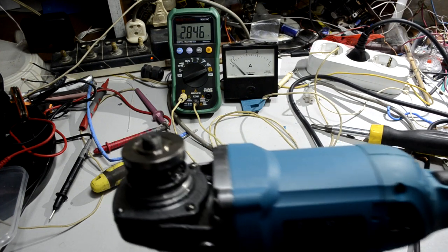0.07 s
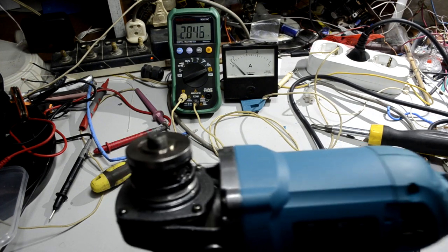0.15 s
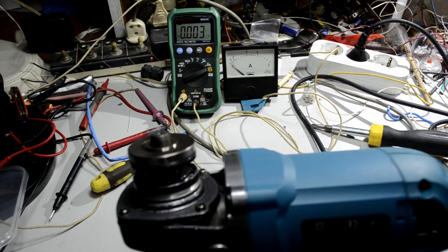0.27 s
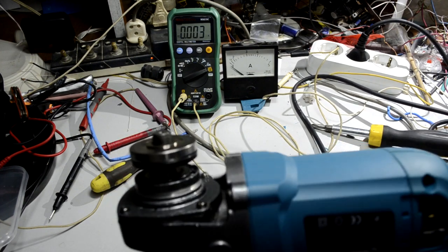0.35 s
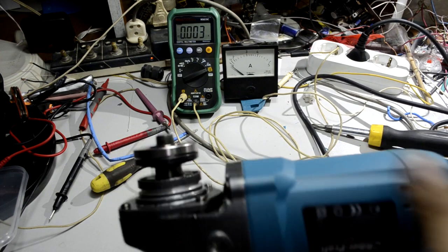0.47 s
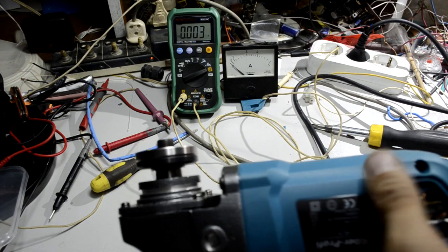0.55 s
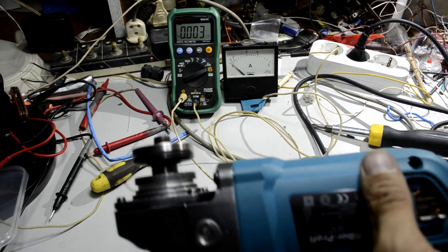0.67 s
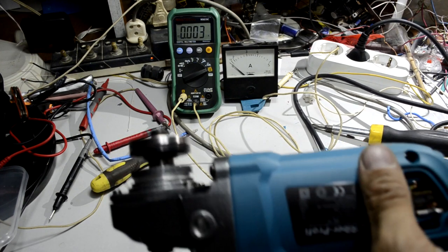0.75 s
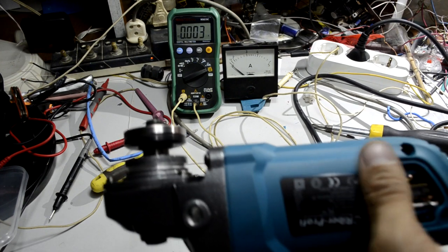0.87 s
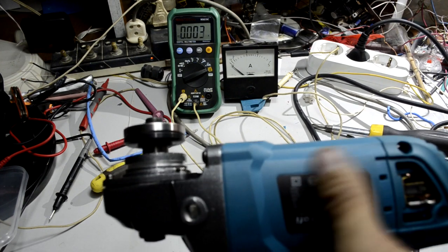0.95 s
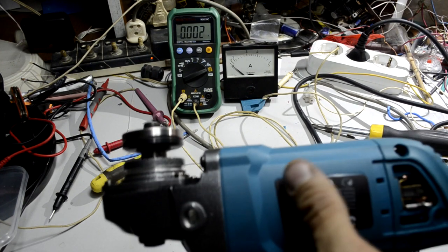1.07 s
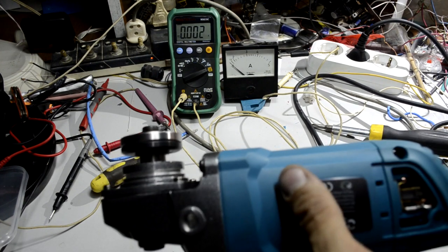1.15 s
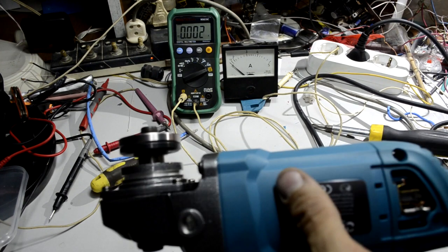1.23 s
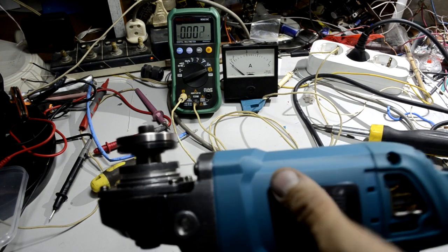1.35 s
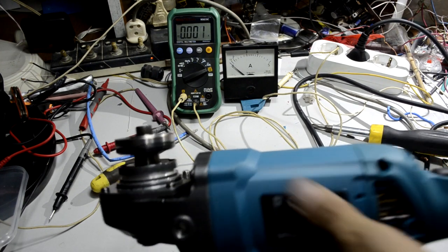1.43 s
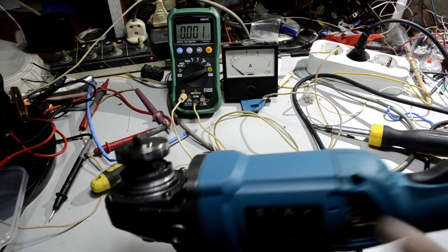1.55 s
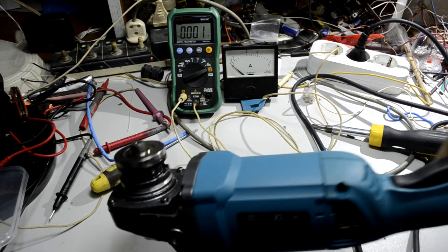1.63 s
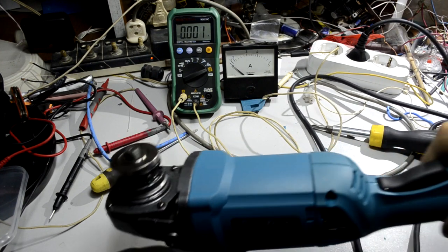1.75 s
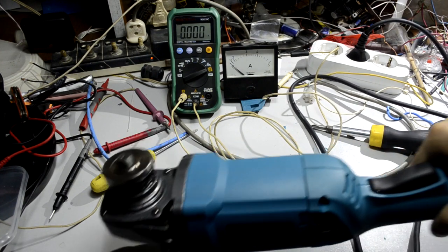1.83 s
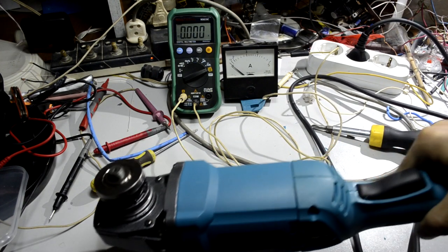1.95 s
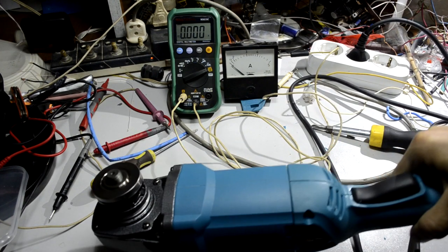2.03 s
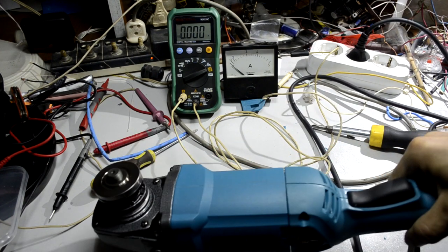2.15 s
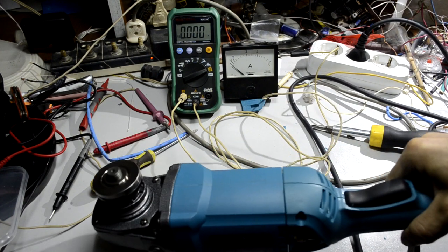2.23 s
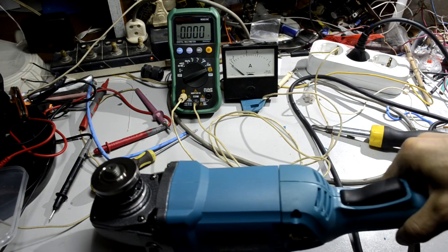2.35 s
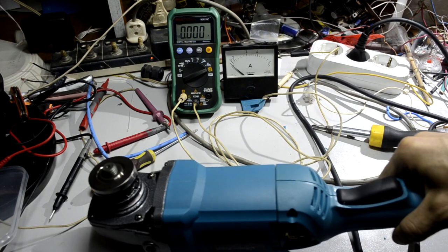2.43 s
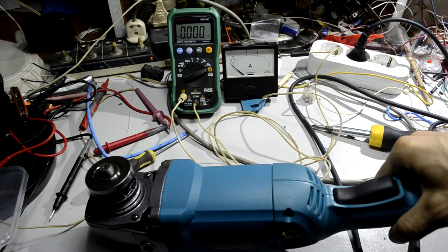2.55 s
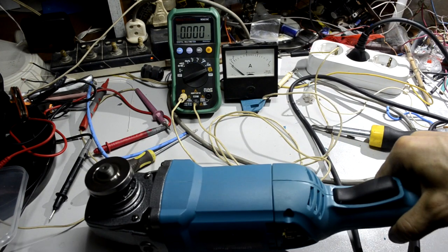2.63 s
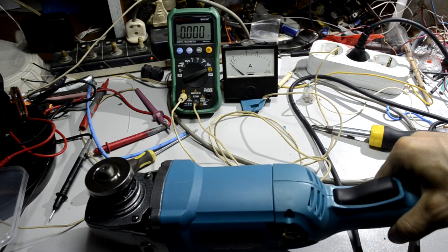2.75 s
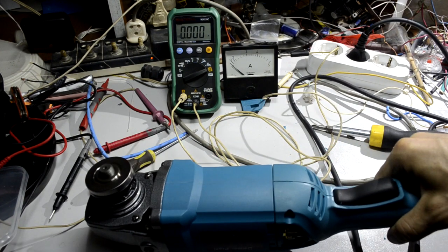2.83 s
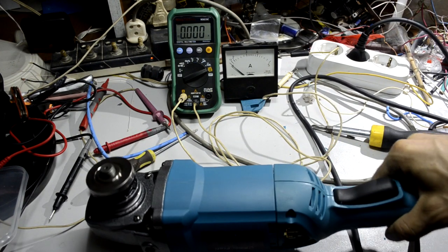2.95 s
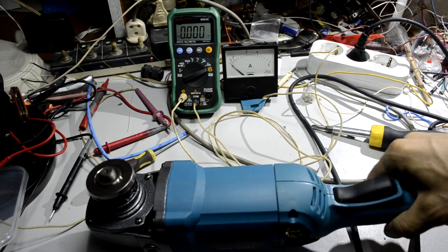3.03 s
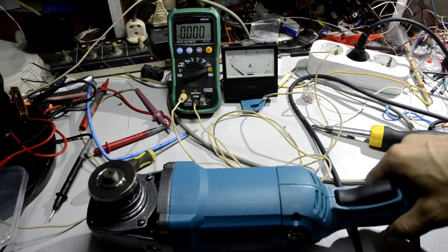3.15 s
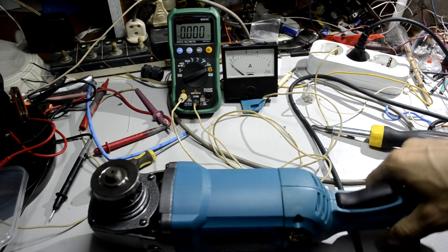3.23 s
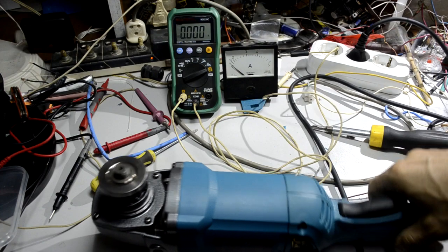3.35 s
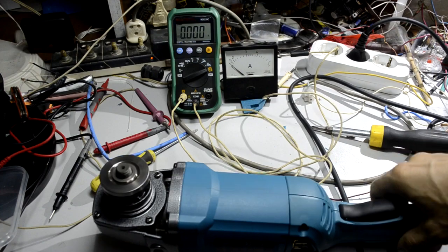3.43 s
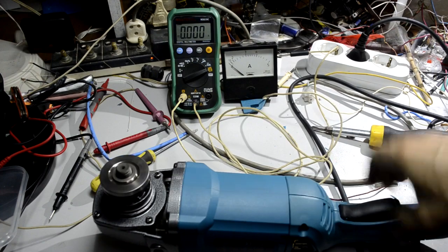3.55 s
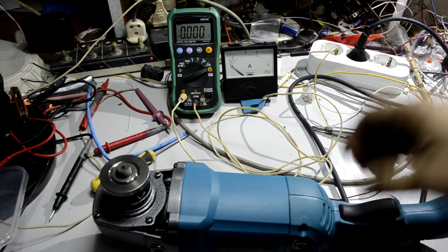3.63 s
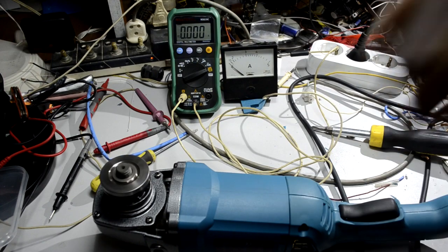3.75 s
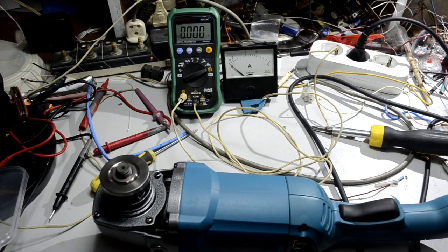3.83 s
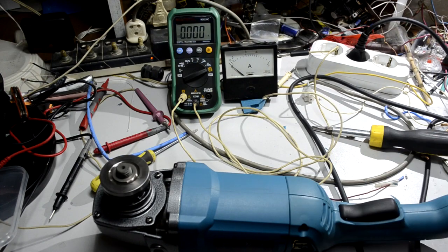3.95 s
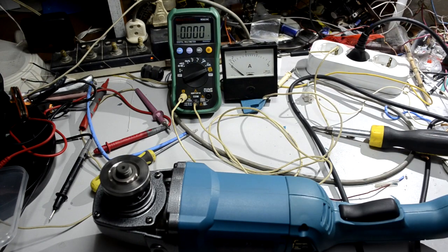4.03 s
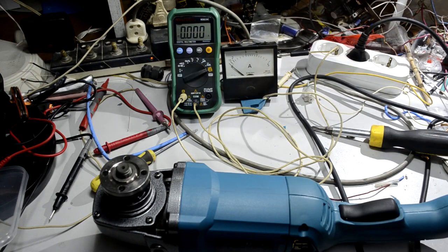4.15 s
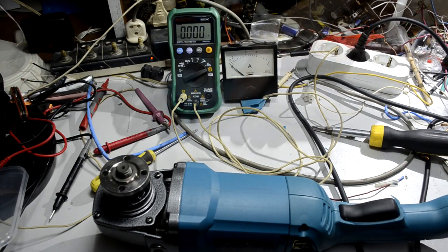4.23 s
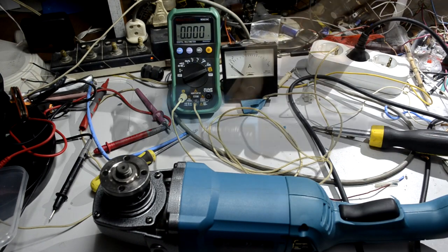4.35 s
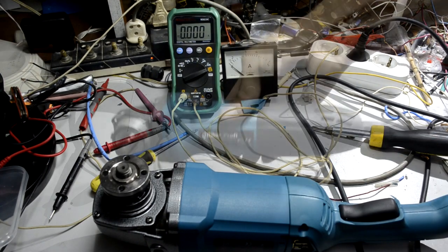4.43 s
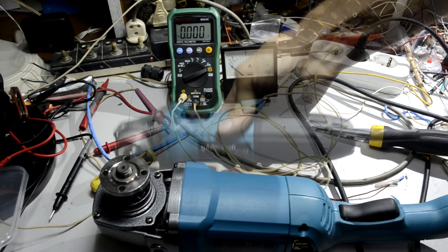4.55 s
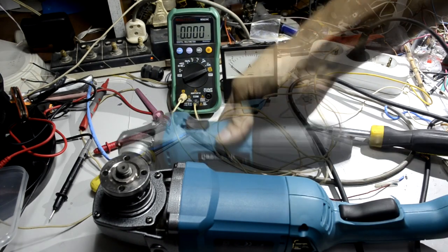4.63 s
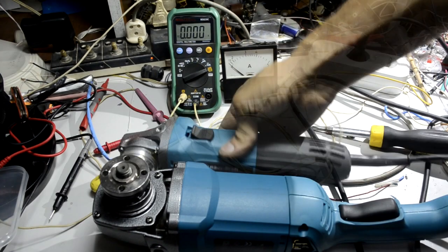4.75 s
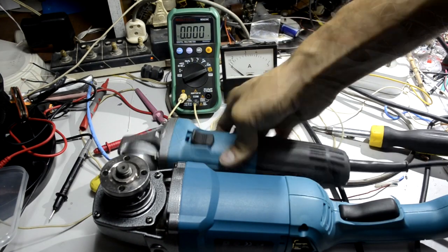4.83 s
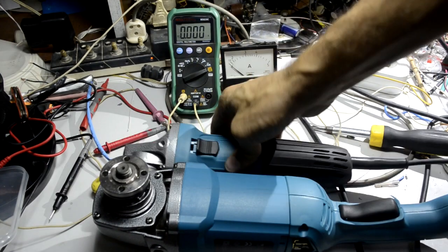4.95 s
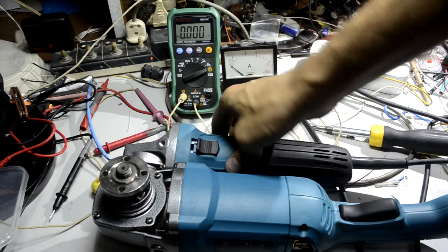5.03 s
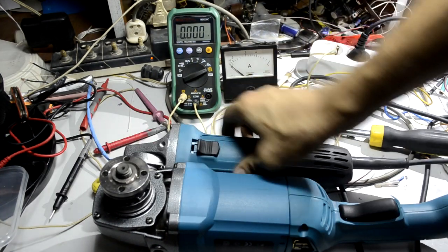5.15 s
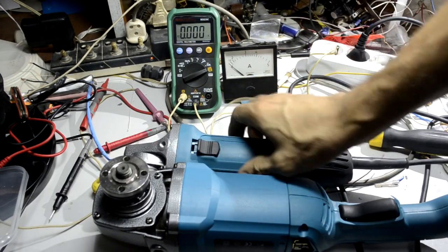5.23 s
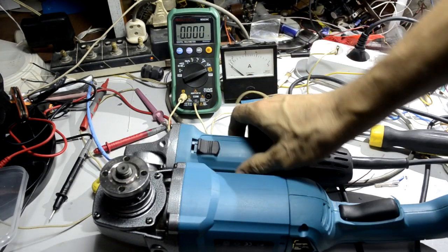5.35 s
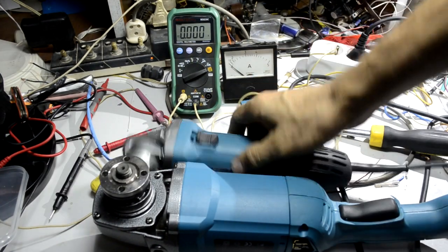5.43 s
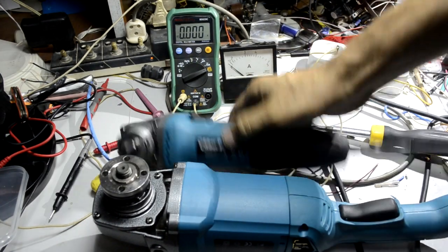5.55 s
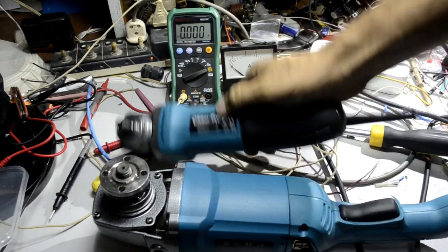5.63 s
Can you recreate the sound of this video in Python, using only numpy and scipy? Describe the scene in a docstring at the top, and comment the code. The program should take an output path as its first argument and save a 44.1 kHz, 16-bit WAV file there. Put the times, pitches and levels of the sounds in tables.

```python
"""First you hear the roar and gliding whine of an angle grinder without a disc, just switched off, close by.
Shaped noise makes the fan, bearings and brushes, which sink with the speed; sine waves make the whine. The
slack bevel gears rattle ever more slowly, until single clacks of noise stand out and the shaft stops. Fading
tones and noise bursts knock as the tool settles and is laid on the bench of a small workshop. Further knocks
follow as a second grinder is set down beside it and shifted, with a soft scrape of shaped noise."""
import sys
import numpy as np
from scipy import signal
from scipy.fft import rfft, irfft, next_fast_len
from scipy.io import wavfile
from scipy.ndimage import map_coordinates

SR = 44100
rng = np.random.default_rng(int(sys.argv[2]) if len(sys.argv) > 2 else 0)


def dump_mix(stems):
    """Bounce the given channels to the path in sys.argv[1] as a 16-bit WAV at rate SR."""
    frames = np.atleast_2d(stems).T  # one column per channel
    limited = np.clip(frames, -1, 1)  # hard clip at full scale
    pcm = np.round(limited * 32767).astype(np.int16)
    wavfile.write(sys.argv[1], SR, pcm)


N = 250913
T = np.arange(N) / SR  # time in seconds
RING_T = T[:SR // 3]  # the time given to one ringing knock
BARS = 24  # copper bars on the commutator
QUIET_DB = -57.5
TOP_HZ = 15950  # nothing is kept from here up

# Levels in the tables are relative: most get a fixed trim where they are used.
# How fast the motor shaft turns as it coasts: time_s, speed_turns_per_s
SHAFT_SPEED = [(0, 423), (.35, 361), (.6, 325.5), (.87, 290.5), (1.18, 253), (1.5, 217), (1.73, 193),
               (2.05, 162.5), (2.22, 145.5), (2.55, 116), (2.77, 97.3), (3.08, 73), (3.5, 44), (4.2, 0)]
# Loudness of the running parts: time_s, fan_db, bearings_db, brushes_db
RUNNING_LEVELS = [(0.0, -17, -16, -33.5), (1.08, -19, -16.5, -40.5), (1.19, -19.5, -17.5, -42),
                  (1.61, -24, -18, -45.5), (2.07, -27.5, -23, -49), (2.43, -30, -23.5, -51),
                  (2.72, -35.5, -25.5, -57), (2.96, -37, -28, -58), (3.21, -35.5, -31, -65),
                  (3.69, -38, -38, -74), (3.89, -41, -51, -76.5), (4.0, -50, -59.5, -85),
                  (4.13, -54, -57.5, -79), (4.25, -60, -62.5, -84)]
# Two housing tones excited by the rattle: time_s, low_tone_db, high_tone_db
SINGING_LEVELS = [(0.0, -22, -38), (1.0, -35, -17), (1.11, -27, -17), (1.19, -31, -22), (1.51, -42, -20),
                  (1.54, -23, -25), (1.9, -18.5, -34), (1.96, -14.5, -59), (2.14, -31, -44),
                  (2.17, -12, -31.5), (2.45, -29, -50)]
# Tone colour of the fan roar: pitch_hz, level_db
FAN_COLOUR = [(30, -49), (70, -38.5), (140, -15.5), (250, -9), (420, -4.5), (650, 0), (900, 6), (1300, 0.5),
              (2200, -10), (4000, -33.5), (8000, -49)]
# Tone colour of the rolling bearings: pitch_hz, level_db
BEARING_COLOUR = [(100, -46), (400, -30), (800, -3), (1500, -3), (2400, 0.5), (3300, -2), (4300, -6),
                  (5200, -17), (6400, -35), (9000, -62), (15000, -62)]
# Tone colour of the brush hiss: pitch_hz, level_db
BRUSH_COLOUR = [(1500, -19.5), (4000, 5.5), (5500, 3), (7200, 3), (9000, 0), (10200, -0.5), (11800, 0.5),
                (13500, -4), (15800, -18)]
# Tone colour of gear teeth hitting: pitch_hz, level_db
CLACK_COLOUR = [(60, -46), (250, -18), (500, -11), (900, -9.5), (1550, 2), (2100, -3.5), (2900, -2),
                (4200, -8), (5300, -30.5), (6900, -23), (7600, -12), (8050, -16.5), (8700, -38),
                (10800, -37), (11700, -28.5), (12800, -36.5), (15500, -54.5)]
# Resonances of the housing: pitch_hz, width_hz, level_db (against the broad colour)
HOUSING_MODES = [(396.7, 13, 1.5), (583.4, 21, -3), (749.5, 23, -3), (858.4, 18, 2), (1103, 26, 2.5),
                 (1430, 60, -3.5), (1587, 23, -4), (1843, 40, -1.5), (2015, 49, 6), (2270, 22, -13.5),
                 (2544, 81, -8.5), (3170, 120, -10.5), (3450, 75, -8.5), (4330, 90, -10)]
# Whine tones: order (cycles per shaft turn), level_db, band_centre_hz, band_width_octaves
WHINE_ORDERS = [(1, -22, 430, .11), (24, -28, 2950, .16), (24, -44, 5000, .2), (29, -40, 8750, .07),
                (29, -45, 10300, .22), (44, -53, 6200, .1), (48, -53, 6300, .13)]
# Share of fast rattle in the gearbox noise: speed_turns_per_s, power_share (0 to 1)
RATTLE_SHARE = [(95, .03), (140, .25), (165, .6), (220, .5), (300, .25), (420, .15)]
# Light, fast blows sound less of the gears' high ping: pitch_hz, level_db
LIGHT_BLOW_COLOUR = [(1500, -2), (2400, 2.5), (3300, 2), (4500, -2), (7000, -6.5), (9000, -4.5)]
# Gear teeth clacking across their slack: start_s, level_db, ping_db, bright_db, knock_db
GEAR_CLACKS = [(2.1052, -8, -30, -16, -32), (2.1456, -6, -35, -12, -29), (2.1606, -6, -29, -7, -26),
               (2.1736, -3.5, -23, -12, -25), (2.1884, -5.5, -27, -11, -31), (2.2349, 0.5, -39, -10, -36),
               (2.2504, -3, -37, -17, -31), (2.2664, -4, -31, -26.5, -26), (2.2903, -3, -24, -17, -27),
               (2.3277, -2.5, -28, -13, -36), (2.3534, -6, -25, -11, -22), (2.3654, -11, -24, -22, -30),
               (2.4005, -2.5, -30, -12, -35), (2.4144, -6.5, -26, -18, -39),
               (2.4463, -2.5, -32, -19, -21.5), (2.4689, -1.5, -23, -11, -25), (2.4953, -3, -37, -16, -23),
               (2.5104, -4.5, -22, -14, -36), (2.5263, -1.5, -35, -20, -28), (2.5442, -7.5, -18, -17, -45),
               (2.5632, -2.5, -35, -12, -39), (2.5754, -6, -30, -23, -26), (2.5904, -2, -29, -12, -38),
               (2.6054, -3, -26, -20, -43), (2.6204, -3.5, -22, -17, -31), (2.6638, -6, -21, -23, -35),
               (2.6873, -13, -17, -15, -26), (2.7003, -2.5, -27, -15.5, -36), (2.7413, -5.5, -23, -12, -40),
               (2.7647, -4.5, -24, -31, -30), (2.7762, -8, -30, -19, -27), (2.7924, -10, -28, -22, -25),
               (2.8064, -5.5, -28, -25, -39), (2.8204, -11, -28, -5, -26), (2.8405, -3.5, -29, -10, -35),
               (2.8674, -12, -18, -6, -24), (2.8834, -7, -25, -9, -44), (2.9189, -6, -28, -27, -34),
               (2.9388, -10, -22, -15, -27), (2.9583, -5, -32, -13, -35), (2.9787, -8, -21, -15, -31),
               (3.0062, -1, -36, -24, -30), (3.0381, -4, -32, -12, -34), (3.0756, -0.5, -41, -24, -28),
               (3.114, -5.5, -30, -15, -17), (3.1587, -2.5, -34, -27, -25), (3.2033, -7.5, -40, -22, -19),
               (3.2222, -7, -34, -11, -20), (3.2492, -7.5, -37, -3, -36), (3.2721, -8, -39, -9, -25),
               (3.2886, -6, -41, -8, -24), (3.3155, -6, -41, -12, -26), (3.3679, -5, -43, -13, -26),
               (3.3878, -5.5, -48, -31, -23), (3.4293, -7.5, -36, -11, -25), (3.4791, -11, -39, -9, -30),
               (3.5245, -11, -38, -2, -23), (3.5555, -6, -53, -27, -23), (3.6233, -12, -48, -10, -24),
               (3.6951, -16.5, -41, -33, -21), (3.7351, -10.5, -49, -16, -18),
               (3.7525, -10.5, -51, -31, -19), (3.7928, -10, -42, -24, -20), (3.8912, -10, -54, -27, -38),
               (3.9396, -13, -49, -18.5, -15), (3.9805, -19.5, -56, -33, -22),
               (4.0277, -11, -48, -30, -15.5), (4.0524, -19.5, -54, -27, -5), (4.0664, -24, -52, -26, -18),
               (4.0824, -29, -50, -25, -10), (4.1077, -36, -47, -20, -16), (4.1277, -22.5, -53, -36, -12),
               (4.1551, -25.5, -38, -33, -1)]
# Running tool settling on the bench: start_s, level_db, sway_db
SETTLING_THUDS = [(2.335, -18, -41), (2.459, -16, -47), (2.524, -29, -41), (2.936, -32.5, -53),
                  (3.018, -33, -57), (3.185, -35, -51), (3.42, -32, -39)]
# Contacts with the bench: start_s, peak_db (not used), thud_db, board_db, case_db, tick_db
BENCH_CONTACTS = [(4.574, -42, -64, -54, -52, -50), (4.608, -47.5, -61, -56, -54, -54.5),
                  (4.661, -33, -29, -25, -21.5, -45), (4.682, -18, -34, -36, -33, -44),
                  (4.733, -25, -38, -33, -37.5, -46.5), (4.777, -32, -43, -35, -39, -56),
                  (4.933, -23.5, -35, -23, -30, -39), (4.96, -31, -39, -44, -48, -49),
                  (4.983, -33, -48, -57, -64, -56.5), (5.028, -37, -54.5, -57.5, -55, -64),
                  (5.148, -35.5, -44, -42.5, -62, -73), (5.17, -34, -53, -48, -50, -49.5),
                  (5.239, -35, -57, -58, -46, -61.5), (5.3, -25, -53, -49.5, -43.5, -41.5),
                  (5.441, -24, -33.5, -30.5, -36.5, -54.5), (5.455, -26, -35, -44, -41, -56),
                  (5.588, -30, -44, -42.5, -40.5, -78)]
# Ringing of the heavy bench: pitch_hz, level_db, fade_by_60_db_s
BENCH_MODES = [(123.2, -4, 0.1), (168.5, -3.5, 0.17), (205, -12, 0.12), (243, -5.5, .09),
               (295, -5.5, 0.068)]
# Low sway of the bench frame: pitch_hz, level_db, fade_by_60_db_s
FRAME_MODES = [(72, 2, .1), (94, 2, 0.12), (114, -9, 0.44)]
# Ringing of the bench's top board: pitch_hz, level_db, fade_by_60_db_s
BOARD_MODES = [(372, -6.5, 0.11), (426, -8.5, 0.12), (485, -8, 0.13), (672, -3.5, 0.09), (755, -6.5, 0.12),
               (825, -9.5, .06), (987, -5, 0.047), (1140, -5, 0.076)]
# Ringing of the tool's case: pitch_hz, level_db, fade_by_60_db_s
CASE_MODES = [(1360, -1.5, .08), (1460, -1, 0.067), (1575, -1, 0.083), (1650, -6.5, 0.055),
              (1850, -14.5, 0.057), (2170, -20, 0.081), (2534, -14.5, 0.082), (3600, -22.5, .1),
              (3940, -22.5, 0.088)]
# Tone colour of the contact ticks: pitch_hz, level_db
TICK_COLOUR = [(1000, -25), (2500, 5.5), (3700, 0.5), (5500, -11.5), (8000, -18.5), (13000, -25),
               (16000, -24)]
# Loudness of the case sliding on the bench: time_s, level_db
SLIDE_LEVELS = [(5.1, -72), (5.216, -53), (5.336, -48.5), (5.408, -52.5), (5.566, -59.5), (5.69, -54)]
# Tone colour of that scrape: pitch_hz, level_db
SCRAPE_COLOUR = [(180, -18.5), (300, -4.5), (669, -22.5), (712, -11.5), (1560, -6), (1690, -9.5),
                 (1830, -7.5), (2070, -13), (12000, -54.5), (15600, -71), (22000, -120)]
# Tone colour of the room hush: pitch_hz, level_db
HUSH_COLOUR = [(15, -29.5), (25, 3.5), (27, -16), (71, -26.5), (98, -19.5), (250, -17.5), (293, -1.5),
               (344, -14.5), (1120, -12.5), (2300, -21.5), (3540, -24.5), (5720, -41.5), (15000, -43.5)]
# How long the room rings at each pitch: pitch_hz, fade_by_60_db_s
ROOM_FADE = [(150, 0.4), (1500, 0.2), (5000, 0.39), (14000, .12)]


def amp(db):
    """Turn decibels into a gain."""
    return 10 ** (np.asarray(db) / 20)


def unit(x):
    """Scale a sound to an average (rms) level of 1."""
    return x / np.sqrt(np.mean(x ** 2) + 1e-20)


def unit_start(x):
    """Scale a fading sound so that its first 30 ms have level 1."""
    return x / np.std(x[:SR * 3 // 100])


def along(points, hz):
    """Read a table of (pitch_hz, value) between its points, on a log pitch axis."""
    pitch_hz, value = np.transpose(points)
    return np.interp(np.log(hz + 1), np.log(pitch_hz + 1), value)


def curves(rows):
    """Draw each column after the time as a curve with one value per sample."""
    time_s, *columns = np.transpose(rows)
    return [np.interp(T, time_s, column) for column in columns]


def wobble(rate):
    """Make a smooth random curve through `rate` random points a second."""
    return map_coordinates(rng.standard_normal(int(N * rate / SR) + 4), [T * rate])


def filtered(x, gain):
    """Filter a sound by a gain over pitch, without any sound before its cause."""
    size = 2 * next_fast_len(len(x) // 2 + 8192)
    log_gain = np.log(np.maximum(gain(np.fft.rfftfreq(size, 1 / SR)), 1e-6))
    # folding the cepstrum forward in time gives the minimum-phase filter
    cepstrum = irfft(log_gain)
    cepstrum[1:size // 2] *= 2
    cepstrum[size // 2 + 1:] = 0
    return irfft(rfft(x, size) * np.exp(rfft(cepstrum)), size)[:len(x)]


def colour(points):
    """Turn a tone colour table into a gain over pitch."""
    return lambda hz: amp(along(points, hz))


def housed(points):
    """Put the housing's resonances on top of a tone colour."""
    def gain(hz):
        peaks = sum(amp(db) / (1 + (2 * (hz - f) / width) ** 2) for f, width, db in HOUSING_MODES)
        return colour(points)(hz) * (1 + peaks)
    return gain


def clack_colour(hz):
    """Gain over pitch of gear teeth heard through the housing."""
    return housed(CLACK_COLOUR)(hz)


def noise(gain, flutter=1):
    """Make noise of level 1, fluttering before it is coloured."""
    return unit(filtered(rng.standard_normal(N) * flutter, gain))


def add(track, start_s, x):
    """Mix a sound into the track at a given time."""
    part = track[max(round(start_s * SR), 0):][:len(x)]
    part += x[:len(part)]


def fan(fan_db):
    """Rushing air is noise with quick random swells, coloured by the housing."""
    return amp(fan_db + 0.5) * noise(housed(FAN_COLOUR), amp(1.8 * wobble(300)))


def jolts(speed):
    """Rattle strength: the teeth meet once a spindle turn, and no slower than they bounce."""
    rate = np.maximum(speed / 3.2, 66) * amp(1.5 * wobble(70))  # blows per second
    # each whole number that the running count passes is one blow
    blows = np.diff(np.floor(np.cumsum(rate) / SR), prepend=0) * rng.uniform(.65, 1, N)
    fade = amp(-60 * RING_T / .012) + amp(-8 - 60 * RING_T / .04)
    return signal.fftconvolve(blows, fade)[:N]


def gearbox(bearing_db, speed, beat, shaking):
    """Rolling bearings and fast gear rattle share the power according to the speed."""
    share = np.interp(speed, *np.transpose(RATTLE_SHARE))
    rolling = noise(housed(BEARING_COLOUR), beat * amp(1.0 * wobble(700)))
    rattle = noise(lambda hz: clack_colour(hz) * colour(LIGHT_BLOW_COLOUR)(hz), shaking)
    return amp(bearing_db) * (np.sqrt(1 - share) * rolling + np.sqrt(share) * rattle)


def brushes(brush_db, beat):
    """Rubbing brushes hiss, fluttering with each turn and at random."""
    return amp(brush_db + 7.5) * noise(colour(BRUSH_COLOUR), beat * amp(0.96 * wobble(900)))


def shaken_mode(shaking, centre_hz, width_hz):
    """A resonance driven by the rattle turns noise into a narrow, rough tone."""
    def gain(hz):
        offset = hz - centre_hz
        return 1 / np.hypot(1, 2 * offset / width_hz) * np.exp(-(offset / 500) ** 2)
    return noise(gain, shaking + .3)


def singing(shaking):
    """The rattle makes two housing resonances sing in turn."""
    low_db, high_db = curves(SINGING_LEVELS)
    low = amp(low_db - 6) * shaken_mode(shaking, centre_hz=2070, width_hz=130)
    high = amp(high_db - 6) * shaken_mode(shaking, centre_hz=3200, width_hz=120)
    return low + high


def wheel_ping(speed, shaking):
    """At middling speeds the rattle makes the gear wheel ping."""
    swell = np.exp(-((speed - 125) / 55) ** 2) * (speed > 45)  # turns per second
    return amp(-49) * swell * shaken_mode(shaking, centre_hz=7750, width_hz=650)


def coasting(speed, turns):
    """The turning parts make noise that fades out as the shaft stops."""
    fan_db, bearing_db, brush_db = curves(RUNNING_LEVELS)
    beat = 1 + 0.12 * np.cos(2 * np.pi * turns)  # one flutter per turn
    shaking = jolts(speed)
    running = fan(fan_db) + gearbox(bearing_db, speed, beat, shaking)
    running += brushes(brush_db, beat) + wheel_ping(speed, shaking)
    # the singing is gone below 120 turns per second
    return running * np.clip(speed / 6, 0, 1) + singing(shaking) * np.clip(speed / 40 - 3, 0, 1)


def whine(speed, turns):
    """Tones tied to the shaft glide down and swell as they pass bands that radiate well."""
    def line(order, db, centre_hz, octaves, waver_db):
        distance = np.log2((order * speed + 1) / centre_hz) / octaves
        level = amp(db + waver_db * wobble(45)) * np.exp(-.5 * distance ** 2)
        return level * np.sin(2 * np.pi * order * turns)
    strong = sum(line(*row, waver_db=3) for row in WHINE_ORDERS)
    # small flaws repeat with every turn: a comb of faint tones
    comb = sum(line(k, -63 + 3 * rng.normal(), 8000, .45, 4) for k in range(33, 63))
    # the brushes tick over the commutator bars: high harmonics, each weaker than the last
    bars = sum(line(BARS * k, -45 - 1.9 * k - .14 * k * k, 13900, .11, 4) for k in range(2, 10))
    return strong + comb * np.minimum(speed / 170, 1.5) + bars


def background():
    """The room hush is noise, with a faint steady whistle near the top of hearing."""
    whistle = amp(-75) * np.sin(2 * np.pi * 15720 * T)
    return amp(QUIET_DB) * noise(colour(HUSH_COLOUR)) + whistle


def clack(crack_t60, ring_t60, ring_db):
    """A raw impact is a noise crack and a short shiver (t60: seconds to fade by 60 dB)."""
    t = T[:SR // 12]
    fade = amp(-60 * t / crack_t60) + amp(ring_db - 60 * t / ring_t60)
    return rng.standard_normal(len(t)) * fade


def gears():
    """As the shaft slows, the rattle breaks up into single clacks of the teeth."""
    out = np.zeros(N)
    for start_s, db, ping_db, bright_db, knock_db in GEAR_CLACKS:
        # each clack has its own balance of low knock, brightness and high ping
        tilt = [(550, 1.56 * (knock_db + 20)), (1100, 0), (2000, 0), (3400, 0.77 * (bright_db + 7.5)),
                (5000, bright_db + 13), (7300, .9 * (ping_db + 21.5))]
        impact = clack(crack_t60=.018, ring_t60=.05, ring_db=-11)
        impact[0] += 5  # the hard first touch of steel on steel
        hit = filtered(impact, lambda hz: clack_colour(hz) * colour(tilt)(hz))
        add(out, start_s + 0.00091, amp(db + 9.5) * hit / np.linalg.norm(hit))
    return out


def room(x):
    """The cluttered workshop answers with a short noise tail that fades by pitch."""
    hz, t, grains = signal.stft(rng.standard_normal(SR // 2), SR, nperseg=256)
    fade = amp(-60 * t / along(ROOM_FADE, hz)[:, None])
    tail = signal.istft(grains * fade, SR, nperseg=256)[1]
    delayed = np.pad(tail / np.linalg.norm(tail), (SR // 200, 0))  # 5 ms later
    return signal.fftconvolve(x, delayed)[:N]


def ring(modes, scatter_db):
    """A struck object rings in fading tones, with new strengths each time."""
    x = 0
    for hz, db, t60 in modes:
        level = amp(db + scatter_db * rng.normal() - 60 * RING_T / t60)
        x = x + level * rng.choice([-1, 1]) * np.sin(2 * np.pi * hz * RING_T)
    return unit_start(x)


def clatter(centre_hz, octaves, t60):
    """Countless small overlapping tones are a band of noise that dies away."""
    burst = rng.standard_normal(len(RING_T)) * amp(-60 * RING_T / t60)
    band = lambda hz: 1 / (1 + (np.log2((hz + 1) / centre_hz) / octaves) ** 4)
    return unit_start(filtered(burst, band))


def knocks():
    """Contacts ring the bench, its top board and the tool's case, with a tick on top."""
    out, ticks = np.zeros(N), np.zeros(N)
    swing = 1 - np.exp(-RING_T / 0.0097)  # the heavy bench takes a moment to swing up
    for start_s, db, sway_db in SETTLING_THUDS:
        thud = amp(db - 6.5) * ring(BENCH_MODES, scatter_db=0.5)
        sway = amp(sway_db + 3.5) * ring(FRAME_MODES, scatter_db=6)
        add(out, start_s, swing * (thud + sway))
    for start_s, _, thud_db, board_db, case_db, tick_db in BENCH_CONTACTS:
        bench = ring(BENCH_MODES, scatter_db=5)
        bench = swing * (bench + amp(-7.5) * clatter(centre_hz=129.4, octaves=0.55, t60=0.19))
        board = ring(BOARD_MODES, scatter_db=3) + clatter(centre_hz=740, octaves=0.72, t60=0.094)
        case = ring(CASE_MODES, scatter_db=2.5)
        case = case + amp(-3) * clatter(centre_hz=1530, octaves=0.53, t60=0.12)
        knock = amp(thud_db + 0.5) * bench + amp(board_db - 8.5) * board + amp(case_db - 10) * case
        add(out, start_s + 0.0013, knock)
        tick = clack(crack_t60=0.0065, ring_t60=0.083, ring_db=-5)
        add(ticks, start_s + 0.0037, amp(tick_db + 10) * tick)
    return out + filtered(ticks, colour(TICK_COLOUR))


def slide():
    """The case scrapes softly over the bench top: fluttering, coloured noise."""
    fade_in = np.interp(T, [5.12, 5.21], [0, 1])
    level = amp(curves(SLIDE_LEVELS)[0] + 1.0)
    return fade_in * level * noise(colour(SCRAPE_COLOUR), amp(3 * wobble(250)))


def scene():
    """Mix all sources at one microphone, the same in both channels."""
    speed = curves(SHAFT_SPEED)[0]
    turns = np.cumsum(speed * (1 + .0012 * wobble(90))) / SR  # turns so far, slightly uneven
    hits = gears() + knocks()
    mono = coasting(speed, turns) + whine(speed, turns) + background()
    mono += hits + amp(-11) * room(hits) + slide()
    return np.array([mono, mono])


def record(dry):
    """Remove everything from the band limit up."""
    return irfft(rfft(dry) * (np.fft.rfftfreq(N, 1 / SR) < TOP_HZ), N)


dry = scene()
out = record(dry)
dump_mix(out)
```